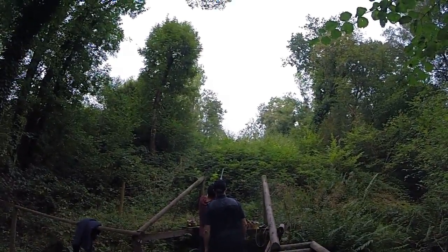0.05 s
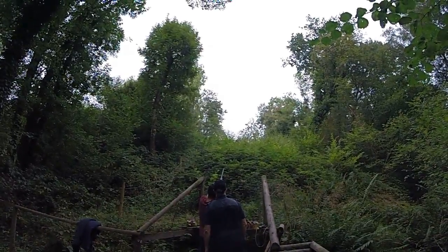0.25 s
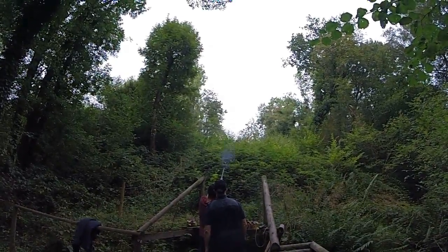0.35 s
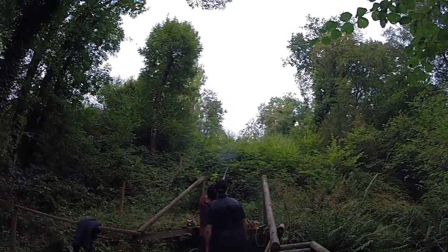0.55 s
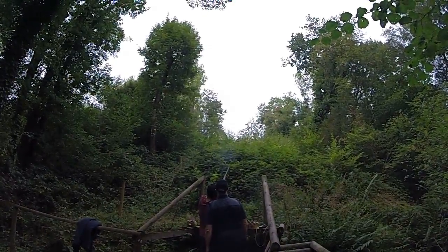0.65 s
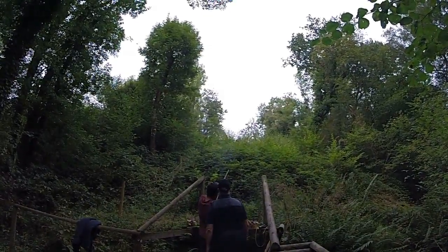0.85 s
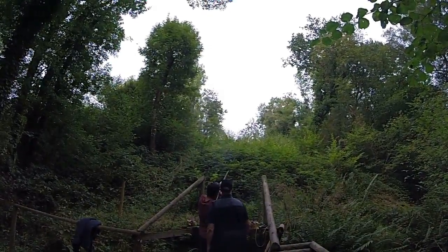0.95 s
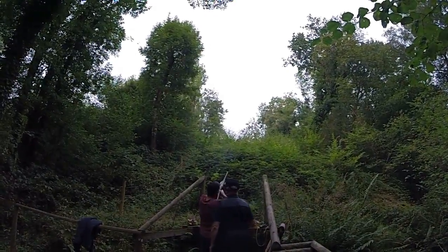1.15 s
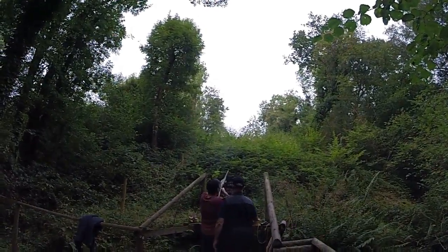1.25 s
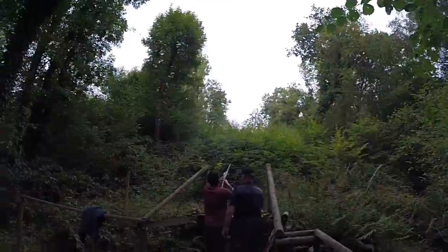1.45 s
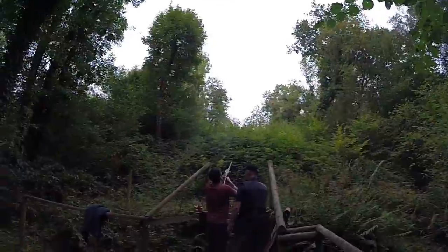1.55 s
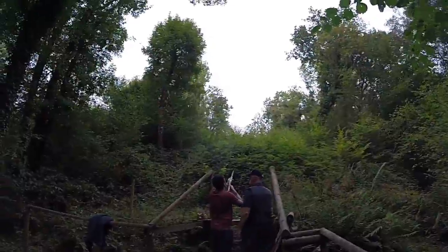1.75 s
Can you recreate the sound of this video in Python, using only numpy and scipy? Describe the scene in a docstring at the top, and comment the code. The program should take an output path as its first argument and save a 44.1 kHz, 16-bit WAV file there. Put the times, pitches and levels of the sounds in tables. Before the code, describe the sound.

Two quick gunshots, the second louder, echo away through a wooded clearing.

```python
"""Two gunshots in quick succession in a wooded clearing, a few metres from a small camera's microphone.
Each blast bounces off the ground and rings briefly at the microphone; trunks and foliage scatter it
into a long, darkening echo. A look-ahead limiter ducks just before the louder second shot, then lets
wind rumble and leaf hiss swell back. Late on, the camera takes a few soft knocks and clothing rustles."""
import sys
import numpy as np
from scipy import signal
from scipy.fft import rfft, irfft
from scipy.io import wavfile
from scipy.ndimage import uniform_filter1d, minimum_filter1d

SR = 44100
rng = np.random.default_rng(int(sys.argv[2]) if len(sys.argv) > 2 else 0)


def transcribe(u):
    """Save the signal u as a 16-bit wav file named by the first command-line argument.

    u: samples, shape (n,) or (channels, n), limited to [-1, 1]; the rate is SR.
    q: integer samples, one column per channel.
    """
    v = np.clip(np.atleast_2d(u).T, -1, 1)
    q = np.round(v * 32767).astype(np.int16)
    wavfile.write(sys.argv[1], SR, q)


N = 79380


def undb(db):
    """Decibels to gain."""
    return 10 ** (np.asarray(db) / 20)


def unit(x):
    """Scale to rms 1."""
    return x / np.sqrt(np.mean(x ** 2))


def curve(rows):
    """Join (t/s, value) rows by straight lines."""
    return np.interp(np.arange(N) / SR, *np.array(rows).T)


def shape(points):
    """Join (f/Hz, level/dB) points on a log axis, one value per frequency bin."""
    hz, db = np.array(points).T
    return np.interp(np.log(np.arange(N // 2 + 1) * SR / N + 1), np.log(hz), db)


def colour(x, db):
    """Minimum-phase filter with the given dB per bin, keeping the power of white noise."""
    cepstrum = irfft(np.log(unit(undb(db))), N)
    cepstrum[1:N // 2] *= 2
    cepstrum[N // 2 + 1:] = 0
    response = irfft(np.exp(rfft(cepstrum)), N)[:N // 8]
    return signal.fftconvolve(x, response)[:N]


def noise(db):
    """Steady noise of rms 1, shaped by the given dB per bin."""
    return unit(irfft(rfft(rng.standard_normal(N)) * undb(db), N))


def wander(rate_hz):
    """A random line of rms 1 that turns rate_hz times a second."""
    step = int(SR / rate_hz)
    stairs = np.repeat(rng.standard_normal(N // step + 1), step)[:N]
    return unit(uniform_filter1d(stairs, step))


def delay(x, s):
    """The same sound s seconds later."""
    return np.concatenate([np.zeros(max(int(s * SR), 0)), x])[:N]


def burst(x):
    """Scale a short sound to the energy of 8 ms at rms 1."""
    return x * np.sqrt(.008 * SR / np.sum(x ** 2))


def breeze():
    """Leaves hiss around the clearing while gusts rumble on the microphone."""
    # spectra of leaves with distant air, and of wind on the microphone (f/Hz, level/dB)
    leaf_spectrum = [(100, 6.5), (250, 6), (450, 3.5), (800, 0), (1200, -1.5), (1600, 0.5), (2000, -3.5),
                     (3000, -4.5), (4500, -11.5), (7000, -13), (9000, -19), (12000, -25), (15000, -26.5)]
    wind_spectrum = [(15, 3), (30, -2.5), (62, 3.5), (85, -2), (115, -16), (170, -21), (300, -29),
                     (700, -35.5), (2000, -71)]
    # strength of each over time (t/s, level/dB)
    leaf_levels = [(0, -58), (.2, -57.5), (1.1, -56.5), (1.38, -56.5), (1.6, -57.5), (1.8, -56.5)]
    gust_levels = [(0, -41.5), (.15, -41.5), (.3, -45), (.4, -50), (.6, -44), (.8, -41), (1.02, -45),
                   (1.22, -37.5), (1.43, -40.5), (1.54, -34.5), (1.59, -39), (1.65, -35.5), (1.69, -39.5),
                   (1.8, -37.5)]
    hiss = noise(shape(leaf_spectrum)) * undb(curve(leaf_levels))
    rumble = noise(shape(wind_spectrum)) * undb(curve(gust_levels))
    return hiss + rumble


def blast(spectrum, modes, bounce_s, bounce_db, gas_s, ring_db):
    """A shock from a few metres off, its ground bounce and a rush of gas, with a brief hard ring."""
    t = np.arange(N) / SR
    gas_db, gas_steepness, ring_build_s = 2, 2.5, .0012
    shock = signal.unit_impulse(N)
    shocks = shock + undb(bounce_db) * delay(shock, bounce_s)
    gas = rng.standard_normal(N) * np.exp(-(t / gas_s) ** gas_steepness)
    bang = burst(colour(burst(shocks) + undb(gas_db) * burst(gas), shape(spectrum)))
    ring = sum(undb(db - 60 * t / t60) * np.sin(2 * np.pi * (hz * t + rng.random()))
               for hz, db, t60 in modes)
    ring *= 1 - np.exp(-(t / ring_build_s) ** 2)
    return burst(bang + undb(ring_db) * burst(ring))


def woods(ripple):
    """Single echoes from close trunks and dense scatter from near and far trees; the treble dies first."""
    # decay of the scatter by band (f/Hz, near trees t60/s, far trees t60/s, far trees level/dB)
    decays = [(149.8, .6, 1.6, -22.5), (502, 0.94, 1.83, -7), (1000, 0.67, 1.81, -12),
              (1700, 0.74, 2.18, -16), (3000, 0.77, 1.59, -14.5), (5800, 0.51, 0.99, -12.5),
              (9000, 0.59, .9, -16), (15000, 0.41, 0.58, -25.5)]
    # echoes off the nearest posts and trunks (delay/s, relative level/dB)
    trunks = [(.0056, -1.5), (.0084, -1), (.012, -5), (.0198, -7.5), (.039, -11)]
    # spectrum of the whole echo (f/Hz, level/dB)
    echo_spectrum = [(60, -20), (160, -24.5), (270, -29), (400, -17), (520, -14.5), (720, -20), (970, -8),
                     (1170, -12.5), (1450, -5.5), (2500, -5.5), (3300, -5), (3750, -10.5), (4400, -7),
                     (5100, -9.5), (6000, -6), (7300, -11.5), (8400, -20.5), (10200, -20), (12000, -30.5),
                     (15500, -34)]
    t, hz = np.arange(N) / SR, np.arange(N // 2 + 1) * SR / N
    grain_db, build_s = 1, .0022
    scatter = rfft(unit(rng.standard_normal(N) * undb(grain_db * wander(2500))))
    log_centres = np.log([row[0] for row in decays])
    # the slope across the clearing throws back a faint late swell
    slope_db = 1.5 * np.exp(-((t - .707) / .04) ** 2)
    echo = np.zeros(N)
    for pick, (_, near_t60, far_t60, far_db) in zip(np.eye(len(decays)), decays):
        band = irfft(scatter * np.interp(np.log(hz + 1), log_centres, pick), N)
        near = undb(-60 * t / near_t60)
        far = undb(far_db + slope_db - 60 * t / far_t60)
        echo += band * np.hypot(near, far)
    echo *= 1 - np.exp(-t / build_s)
    for lag_s, db in trunks:
        slap = burst(rng.standard_normal(N) * np.exp(-t / .0005)) / 2
        echo += undb(db) * delay(slap, lag_s)
    ripple_db = sum(db * np.exp(-((hz - centre) / width) ** 2) for centre, width, db in ripple)
    return colour(echo, shape(echo_spectrum) + ripple_db)


def gunshots():
    """Two close blasts, the second louder, each answered by the woods."""
    # one row a shot (blast level/dB, ground bounce delay/s, bounce level/dB, gas burst length/s,
    # ring level/dB, echo level/dB)
    shots = [(-10, 0.002, -0.5, 0.006, 1, -13.5), (5.5, 0.0026, 4.5, 0.0052, -2, -10)]
    # spectrum of each blast at the microphone (f/Hz, level/dB)
    first_spectrum = [(60, -17), (220, -17), (450, -3.5), (700, 0.5), (950, 5.5), (1200, -10.5), (1700, -1),
                      (2500, -12.5), (4400, 7), (5500, -30), (7200, -10.5), (8200, -21), (10000, -12.5),
                      (11500, -44.5), (15500, -58.5)]
    second_spectrum = [(60, -18), (220, -14), (480, -4), (830, -11), (1150, -9.5), (1800, 0), (2900, 0.5),
                       (3600, -1), (4400, 4), (5500, -3.5), (6600, -6), (8200, -11.5), (10500, -14),
                       (12000, -34), (15000, -24)]
    # resonances that each blast rings (f/Hz, level/dB, t60/s)
    first_modes = [(120, -21, .05), (445, -7, 0.02), (945, -6, 0.023), (1412, -15.5, 0.092),
                   (1633, -6, 0.088), (2015, 1, 0.021), (2420, -4, .03), (3050, -5, 0.047),
                   (3370, -5, .025), (4430, 7, 0.015), (5720, -5.5, .02), (6930, -5.5, .015)]
    second_modes = [(1197, -10, .012), (1608, -8.5, .012), (4400, 7.5, .007), (4502, 0, 0.013),
                    (5470, -11, 0.014), (7340, -15.5, 0.015)]
    # peaks and dips in each echo (f/Hz, width/Hz, level/dB)
    first_ripple = [(1130, 180, -4.5), (1350, 94, 5), (1604, 250, 4.5), (1735, 93, -9), (1930, 60, 3.5),
                    (2234, 90, -3.5), (2462, 220, 9), (2568, 64, -18), (2813, 53, 2.5), (3305, 80, 7.5),
                    (4040, 140, 8), (4030, 60, -3), (4380, 90, 9.5), (5530, 98, 2.5)]
    second_ripple = [(1358, 68, -9), (1628, 120, 4.5), (1910, 110, -13.5), (2260, 150, 2.5),
                     (2777, 200, -1.5), (3230, 120, 4.5), (3500, 110, -2), (4040, 70, -4.5),
                     (4340, 270, 4.5), (4490, 210, -3), (4940, 52, 5), (4769, 90, -2.5), (5750, 250, 4.5),
                     (7520, 160, 1.5)]
    times_s = .2137, .3886
    tones = (first_spectrum, first_modes, first_ripple), (second_spectrum, second_modes, second_ripple)
    out = np.zeros(N)
    for start_s, shot, (spectrum, modes, ripple) in zip(times_s, shots, tones):
        blast_db, bounce_s, bounce_db, gas_s, ring_db, echo_db = shot
        close = undb(blast_db) * blast(spectrum, modes, bounce_s, bounce_db, gas_s, ring_db)
        out += delay(close + undb(echo_db) * woods(ripple), start_s)
    return out


def camera_bumps():
    """Handling noise: each soft knock on the moving camera is a low thump with a dull tick."""
    # knocks on the camera body (t/s, thump level/dB, thump width/s, tick level/dB)
    knocks = [(1.215, -37, 0.011, -64), (1.331, -31, 0.0047, -60), (1.378, -38.5, 0.0031, -49),
              (1.506, -31.5, 0.0018, -55), (1.639, -32.5, 0.0036, -37), (1.714, -38, 0.0019, -51)]
    # spectrum of a tick (f/Hz, level/dB)
    tick_spectrum = [(100, 0), (330, 8), (800, 4.5), (1500, -7), (3000, -3), (4200, -33), (12000, -56)]
    tick_decay_s = .0028
    t, out = np.arange(N) / SR, np.zeros(N)
    for at_s, thump_db, width_s, tick_db in knocks:
        u = (t - at_s) / width_s
        thump = (1 - u ** 2) * np.exp(-u ** 2 / 2)
        tick = colour(rng.standard_normal(N) * np.exp(-t / tick_decay_s), shape(tick_spectrum))
        out += undb(thump_db) * thump + undb(tick_db) * delay(tick, at_s)
    return out


def clothing_rustle():
    """Clothing brushes faintly as someone steps aside."""
    # spectrum of rubbing cloth (f/Hz, level/dB)
    cloth_spectrum = [(500, -19.5), (3000, -8), (4800, 0), (6000, 5), (7500, -11), (11000, -16),
                      (15000, -18)]
    at_s, width_s, level_db = 1.7, .04, -64.5
    t = np.arange(N) / SR
    return noise(shape(cloth_spectrum)) * undb(level_db) * np.exp(-((t - at_s) / width_s) ** 2)


def scene():
    """The clearing in mono at the microphone: shots over the breeze and small movements."""
    return (gunshots() + breeze() + camera_bumps() + clothing_rustle())[None]


def record(dry):
    """The camera's limiter ducks ahead of a peak, holds and recovers; peaks are rounded, the top cut."""
    threshold_db, lookahead_s, hold_s, release_db_per_s = -9.5, .016, .21, 18
    top_hz = 15200
    t, mic = np.arange(N) / SR, dry[0]
    power = uniform_filter1d(mic ** 2, size=353)  # 8 ms mean
    over_db = np.maximum(10 * np.log10(np.abs(power) + 1e-12) - threshold_db, 0)
    released_db = np.maximum.accumulate(over_db + release_db_per_s * t) - release_db_per_s * t
    hold = int(hold_s * SR)
    gain_db = minimum_filter1d(-released_db, hold, origin=(hold - 1) // 2)
    limited = mic * undb(np.interp(t + lookahead_s, t, gain_db))
    rounded = limited / (1 + limited ** 4) ** .25  # soft ceiling at full scale
    low_pass = signal.ellip(12, .2, 80, top_hz, fs=SR, output="sos")
    return signal.sosfilt(low_pass, rounded)[None]


dry = scene()
out = record(dry)
transcribe(out)
```